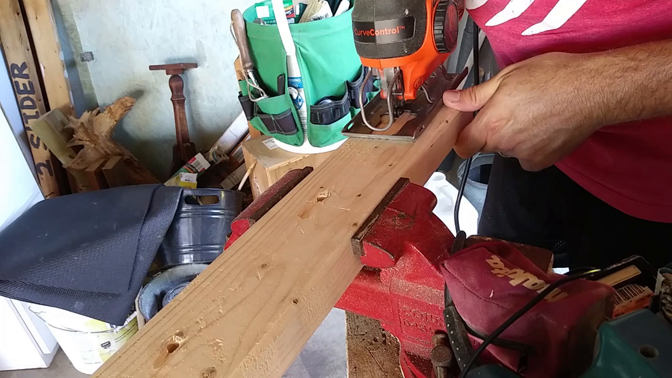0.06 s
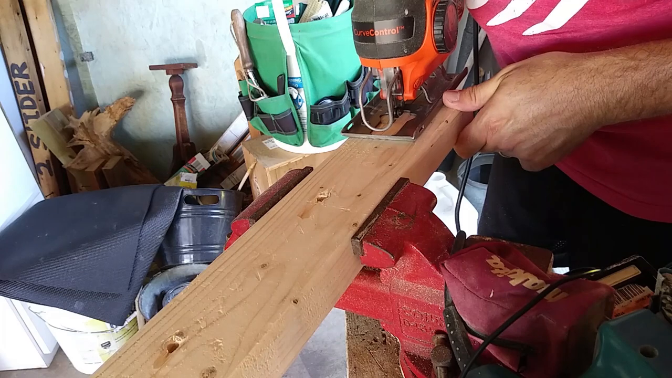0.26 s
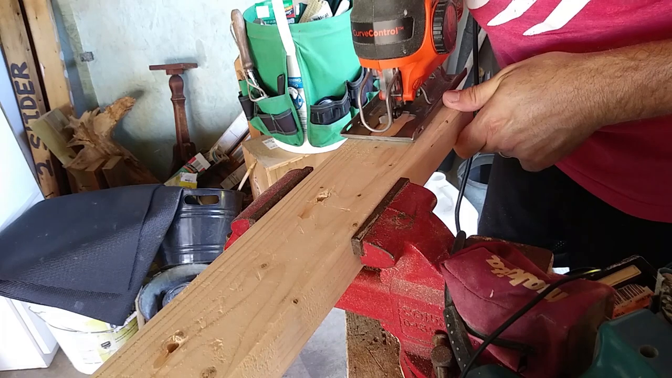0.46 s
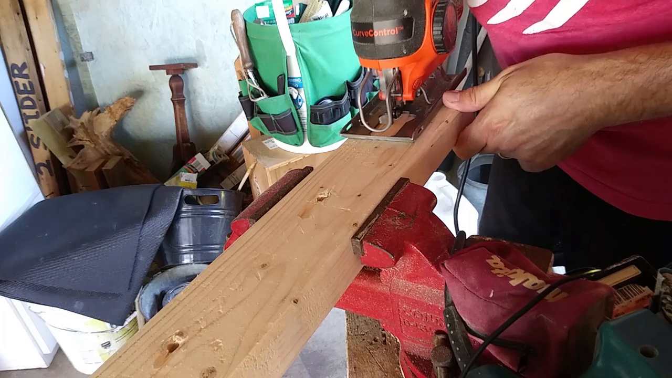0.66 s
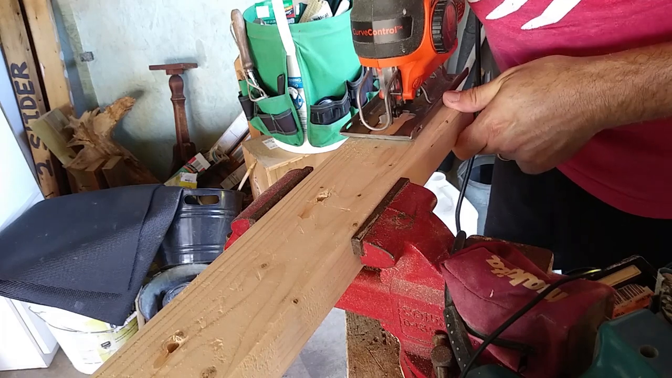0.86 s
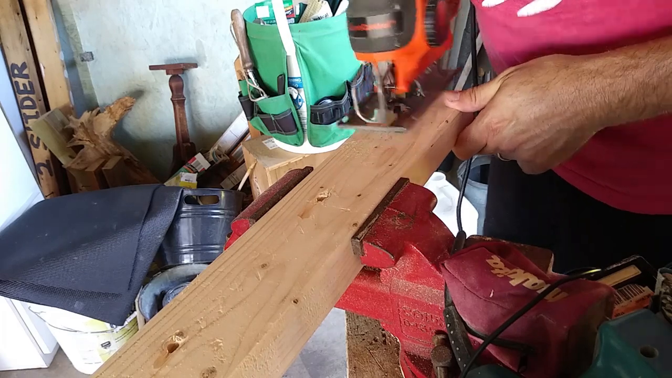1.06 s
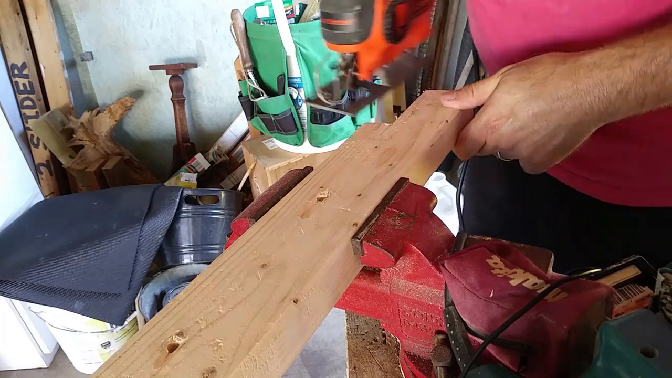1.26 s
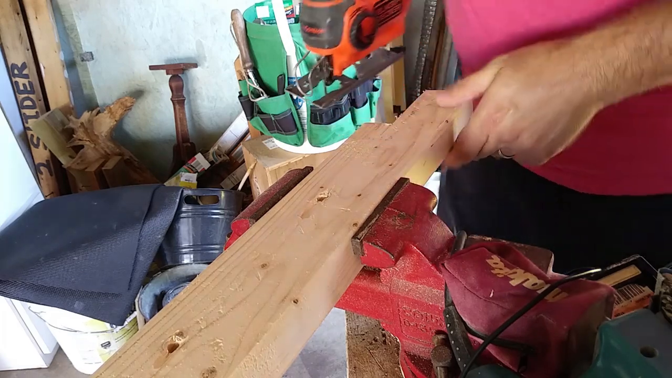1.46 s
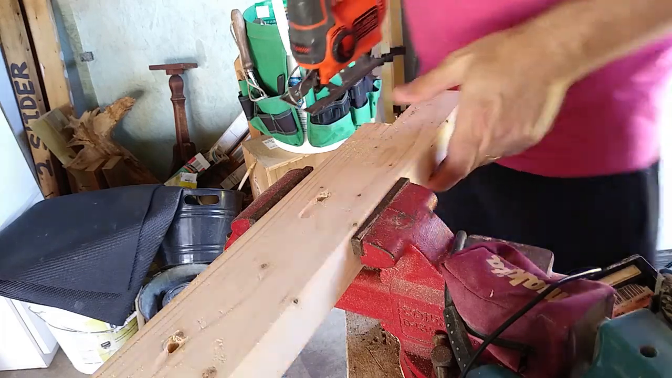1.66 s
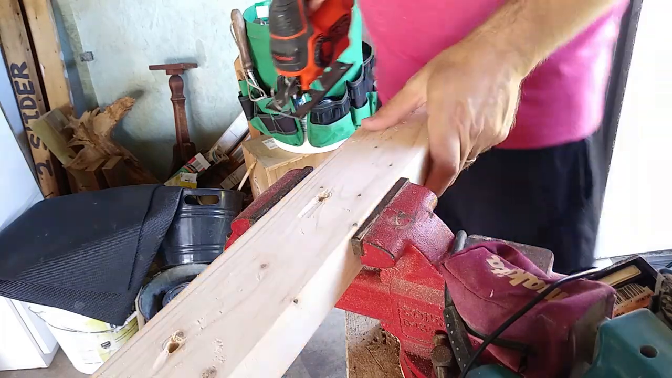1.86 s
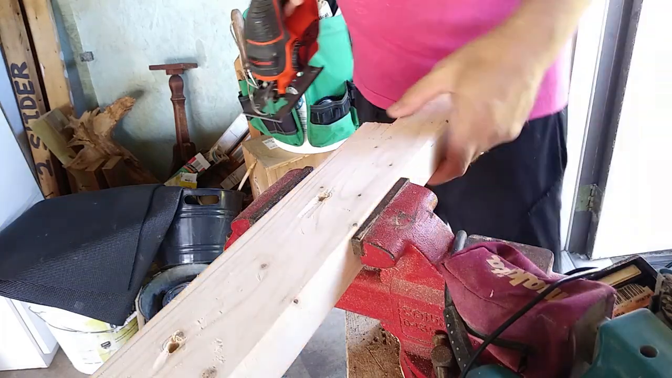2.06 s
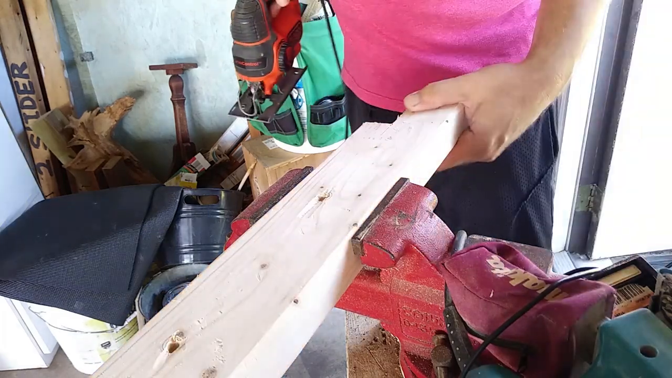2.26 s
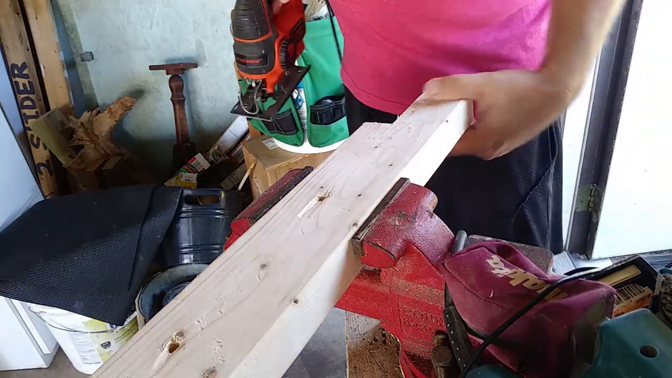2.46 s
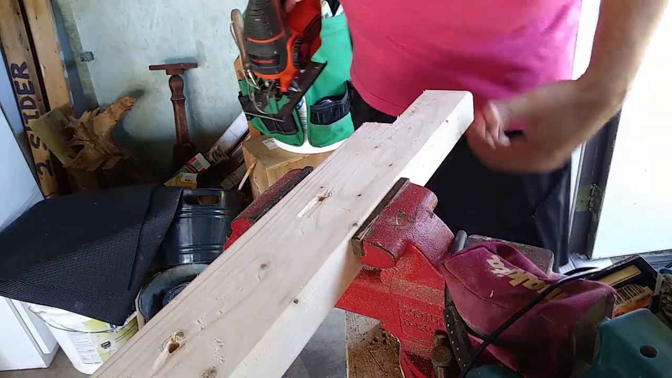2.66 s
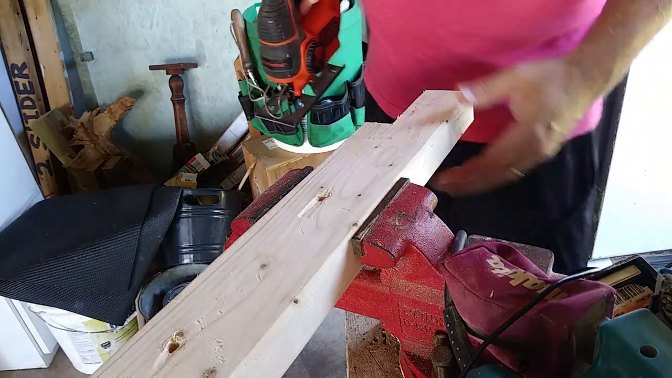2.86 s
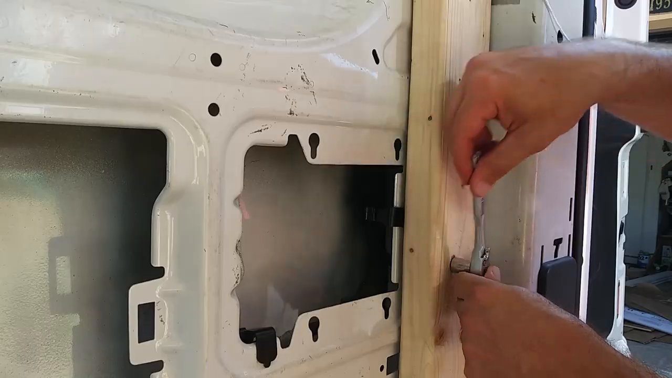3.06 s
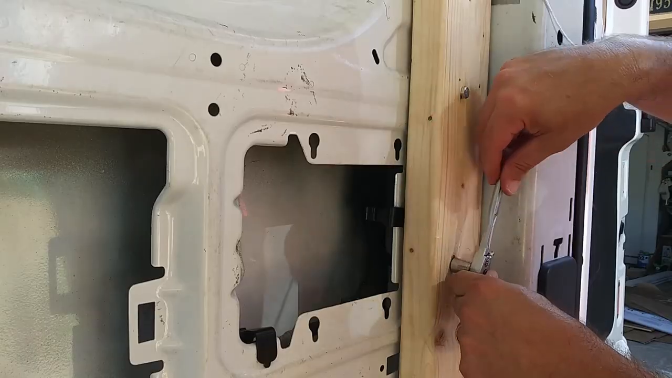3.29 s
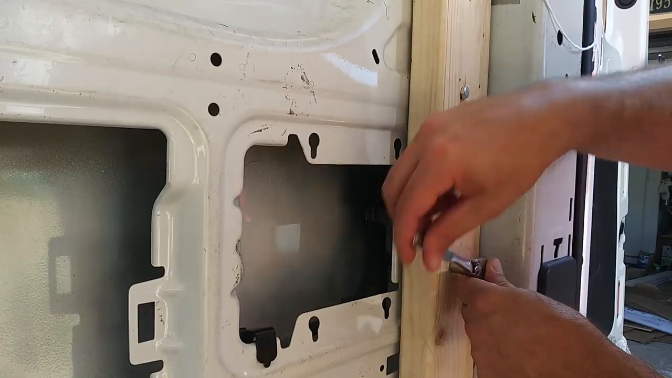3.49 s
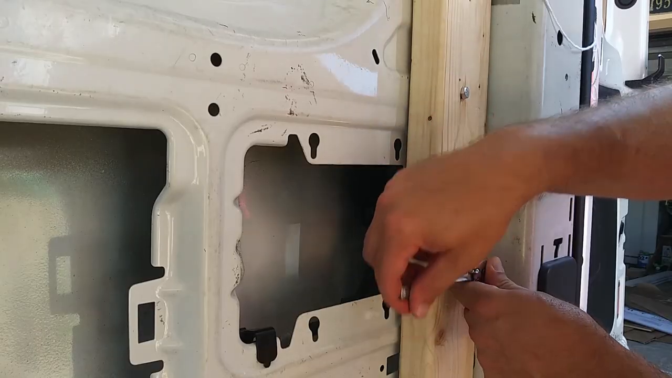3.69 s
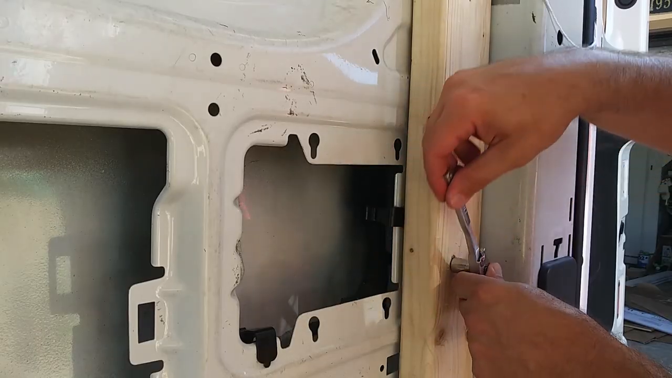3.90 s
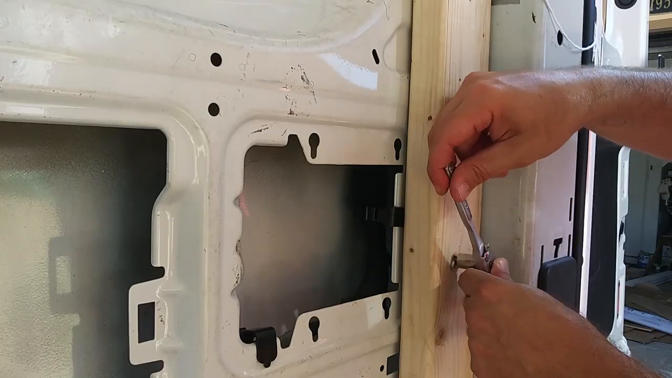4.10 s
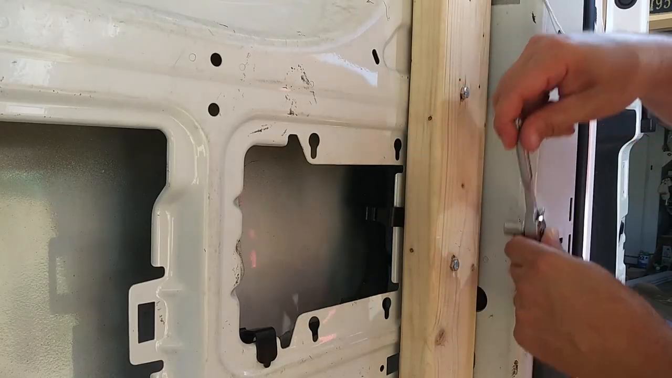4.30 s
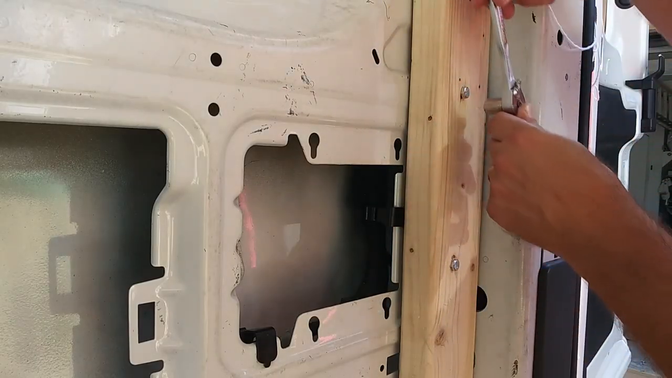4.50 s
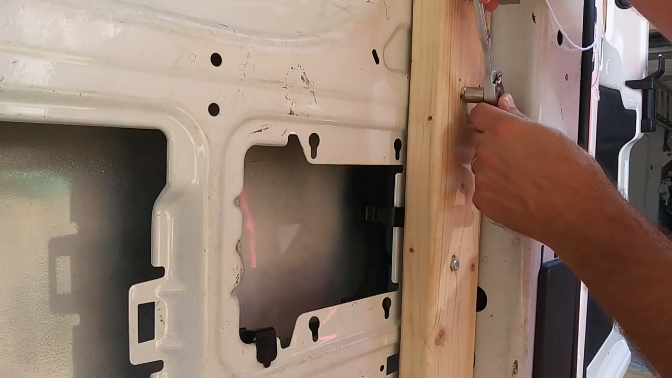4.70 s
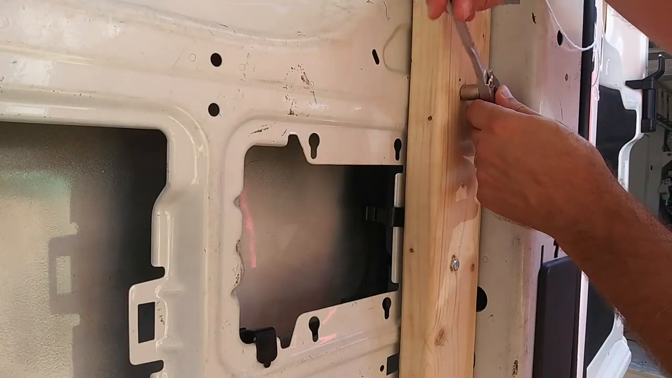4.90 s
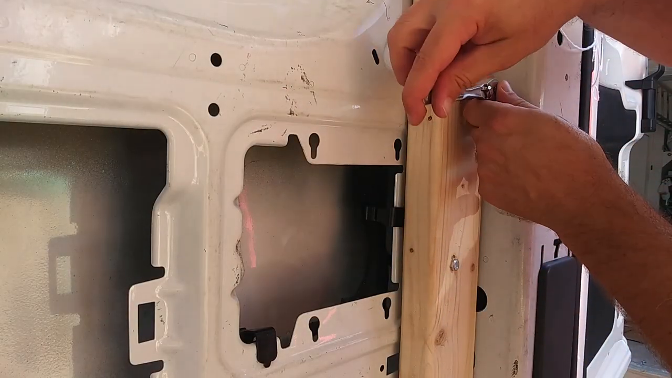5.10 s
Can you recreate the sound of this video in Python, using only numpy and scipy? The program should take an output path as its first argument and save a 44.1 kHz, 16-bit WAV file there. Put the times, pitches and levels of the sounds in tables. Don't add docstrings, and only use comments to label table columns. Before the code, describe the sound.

Close jigsaw noise fills the first part: dense gritty buzz with gear whine, then a steady slowdown into distinct rasping strokes and tiny chirping squeaks until it stops. Quiet room air follows. Then a hand wrench works at a metal panel: light rubbing, dull knocks, rapid ratchet clicking, more scattered knocks, a loud clipped clank with rattles and a final evenly spaced click burst. Short room reflections, limited treble.

```python
import sys
import numpy as np
from scipy import signal
from scipy.fft import rfft, irfft
from scipy.io import wavfile

SR = 44100
rng = np.random.default_rng(int(sys.argv[2]) if len(sys.argv) > 2 else 0)


def boost_factor(decibels):
    exponent = np.asarray(decibels, float) / 20
    return 10 ** exponent


def transcribe(u):
    v = np.clip(np.atleast_2d(u).T, -1, 1)
    q = np.round(v * 32767).astype(np.int16)
    wavfile.write(sys.argv[1], SR, q)


N = 226850
TIME = np.arange(N) / SR

# t/s, rate/(strokes/s)
POWERED = [(0, 30.11), (.3, 28.75), (.4, 29.104), (.561, 29.104)]
# t/s, level/dB
VIGOUR = [(0, 0.5), (.6, -0.15), (1.16, -4), (1.63, -10.5), (1.95, -16), (2.15, -19.5), (2.45, -38),
          (2.55, -50.5), (2.68, -54)]
# f/Hz, density/dB
CUTTING_COLOUR = [(150, -49.5), (250, -31.5), (636, -2.5), (731, -11), (825, -3.5), (1190, -7.5),
                  (2540, -3.5), (2770, 0), (3590, -8.5), (4050, -2.5), (6570, -5), (9290, -16.5),
                  (14600, -23.5), (15600, -33)]
# f/Hz, density/dB
COASTING_COLOUR = [(53, -88), (90, -69), (454, -27.5), (551, -4.5), (812, -20), (925, -16.5), (1050, -10),
                   (1880, -3), (2440, -9), (2900, -4.5), (3680, -8.5), (7990, -6.5), (10600, -20.5),
                   (15600, -34)]
# f/Hz, width/Hz, lift/dB
SAW_MODES = [(645, 45, 3), (1350, 70, 3), (1890, 70, 3.5), (862, 14, 6), (1528, 830, 2), (2800, 90, 3.5),
             (5300, 340, 2.5), (6300, 1200, 2)]
# level/dB, share of vigour, break-through lift/dB
BODY = [(-19.5, 0.96, 3.5), (-13, 1.05, 0.17), (-26, 1.06, 0)]
# powered level/dB, coasting level/dB
TONES = [(-26, -29), (-23, -46), (-21, -24.5)]
# t/s, extra level/dB
BITES = [
    (0.171, 9),
    (0.309, 8),
    (.68, 5),
    (1.15, 4),
]
# start/stroke, earlier/(stroke per stroke/s), length/s,
# extra length/stroke, from f/Hz, to f/Hz
UP = (.04, 0.0026, .005, 0.15, 7700, 8400)
DOWN = (.40, 0.011, .008, .065, 7000, 5800)
# t/s, length/s, from f/Hz, to f/Hz, level/dB
STALL = [
    (0, .022, 1510, 1500, -15),
    (2.037, 0.02, 7600, 9060, -24.5),
    (2.055, 0.024, 7920, 8470, -16.5),
    (2.113, .024, 8350, 6040, -18.5),
    (2.309, 0.019, 7450, 8900, -25.5),
    (2.314, 0.059, 8800, 9000, -39),
    (2.502, 0.068, 6630, 6600, -59),
    (2.583, 0.047, 6550, 6530, -55),
]
# t/s, peak level/dB, ringing f/Hz, thud re peak/dB
PAWL = [(3.4231, -10, 1330, -10), (3.457, -8, 1350, -5.5), (3.492, -12.5, 4100, -12),
        (3.5201, -10.5, 4740, -13), (3.5496, -10.5, 4150, -29), (3.58, -11.5, 6040, -17),
        (3.6152, -10, 5800, -23), (3.6708, -10.5, 5600, -16.5), (4.9887, -9, 4920, -20),
        (5.0387, -9, 4950, -19.5), (5.0822, -10.5, 2430, -15), (5.1354, -7.5, 4760, -22)]
# t/s, peak level/dB, ringing f/Hz, thud re peak/dB
KNOCKS = [(3.1014, -40, 1489, -3.5), (3.1566, -31.5, 1970, -15), (3.1985, -33, 2080, -3),
          (3.3502, -23.5, 3370, -20), (3.3739, -22.5, 1870, -17), (3.3904, -12, 1260, -29),
          (3.7754, -18, 1600, -28), (3.7964, -27, 1340, -11), (3.8425, -13, 1800, -17),
          (4.1014, -25.5, 1174, -5.5), (4.1348, -7, 1630, -28), (4.1428, -14.5, 4700, -11),
          (4.4303, -40.5, 1220, -4), (4.6355, -0.5, 1410, -23.5), (4.7308, -15, 1700, -13),
          (4.7441, -10, 4700, -16.5), (4.7514, -15, 4900, -27), (4.7576, -14, 3650, -7.5),
          (4.777, -13, 2370, -20), (4.8673, -29, 1860, -22), (4.8908, -38.5, 1770, -6)]
# f/Hz, level/dB, t60/s
STEEL = [(2450, -33, .06), (4150, -31, .06), (5100, -32, .06), (7450, -36, .06), (10700, -40, .06),
         (14500, -41, .05)]
# f/Hz, level/dB, t60/s
PANEL = [(740, -26, .14), (800, -27, .15), (900, -26, .14), (960, -28, .12), (1330, -31, .09),
         (1750, -32, .1), (3150, -31, .09)]
# start t/s, end t/s, fade/s, level/dB, centre f/Hz
SCUFFS = [(2.957, 3.003, 0.0034, -52, 6000), (2.954, 2.999, 0.0034, -55.5, 2160),
          (2.959, 3.038, 0.042, -62, 323), (3.0, 3.112, 0.033, -57, 1350),
          (3.098, 3.17, 0.024, -52.5, 1470), (3.151, 3.214, 0.044, -43.5, 1560),
          (3.195, 3.282, .06, -51.5, 507), (3.336, 3.713, 0.079, -48.5, 455),
          (3.402, 3.552, 0.065, -38, 1100), (3.692, 3.784, 0.031, -47.5, 1500),
          (3.779, 3.903, 0.085, -40, 495), (3.836, 3.967, 0.11, -44, 1110), (4.095, 4.168, .01, -39, 1440),
          (4.122, 4.29, 0.13, -50.5, 500), (4.428, 4.538, 0.084, -59, 1400),
          (4.632, 4.733, 0.035, -36, 865), (4.767, 4.89, 0.1, -39, 730), (4.878, 4.965, 0.051, -58, 900)]
# f/Hz, t60/s
ROOM = [(250, 0.44), (1000, 0.24), (4000, 0.15), (9000, 0.16), (16000, 0.093)]
# f/Hz, density/dB
BENCH_FLOOR = [(24, -76), (40, -46.5), (287, -15.5), (318, -14.5), (351, -4), (474, -15), (510, 2.5),
               (623, -12), (884, -2.5), (1690, -10), (15600, -25)]
# f/Hz, density/dB
WALL_FLOOR = [(60, -36), (200, -16), (450, -3), (700, -8), (1500, -7), (2500, -13), (4500, -14),
              (6500, -14), (8500, -23), (15600, -27)]

WOOD_DRAG_PER_S, WOOD_DRAG_S = 2.972, .0956
COAST_S, FRICTION_PER_S = 7.709, 92.355
FIRST_STROKE, FAN_PER_STROKE = -.58, 27.83
BREAK_S, BREAK_WIDTH_S = 0.68, 0.3
SLACK_S, SLACK_WIDTH_S, SLACK_DB = .62, .055, -16
TONES_FADE_S, TONES_FADE_DB_PER_S = 1.035, -120
RASP_DB, RASP_PER_VIGOUR, RASP_SPREAD_DB, BITE_S = -16.5, 1.4, 3.5, 0.047
SQUEAKING = range(24, 39)
DOWN_RISE_HZ_PER_S = 6000
UP_DB, UP_WAKES_PER_S, UP_WAKE_DB = -18.5, 7.5, -.8
DOWN_DB, SQUEAK_SPREAD_DB = -13, .8
SCRAPE_DB, SCRAPE_PER_VIGOUR, UP_SCRAPE_DB = -19, 0.89, 1.5
STALL_SCRAPE_DB = -20
JOLT_S, JOLT_DB, JOLT_RISE_S = 4.6355, -13, .02
WALL_CUT_HZ = 12500
SCENE_CHANGE_S = 2.955
BENCH_FLOOR_DB, WALL_FLOOR_DB = -60.5, -61.5
NOISE_EDGE_HZ, TOP_HZ = 15800, 15780
OVERLOAD = 0.64


def saw_speed():
    release_s, top = POWERED[-1]
    since_s = np.maximum(TIME - release_s, 0)
    coast = (top - WOOD_DRAG_PER_S + FRICTION_PER_S) * np.exp(-since_s / COAST_S) - FRICTION_PER_S
    coast = coast + WOOD_DRAG_PER_S * np.exp(-since_s / WOOD_DRAG_S)
    return np.where(TIME < release_s, in_time(POWERED)[0], np.maximum(coast, 0))


def stroke_phase():
    done = FIRST_STROKE + np.cumsum(saw_speed()) / SR
    chance = rng.standard_normal(50)[done.astype(int) + 1]
    db = RASP_DB + RASP_PER_VIGOUR * in_time(VIGOUR)[0] + RASP_SPREAD_DB * chance
    bites_db = sum(extra_db * bump(s, BITE_S) for s, extra_db in BITES)
    return done, boost_factor(db + bites_db)


def saw_body(phase):
    white, hz = rfft(rng.standard_normal(N)), np.arange(N // 2 + 1) * SR / N
    cutting = coloured(white, CUTTING_COLOUR, SAW_MODES)
    coasting = coloured(white, COASTING_COLOUR, SAW_MODES)
    free = np.clip((TIME - .7) / 2.0, 0, 1)
    swell = np.cos(2 * np.pi * (phase - .25))
    depth_db = np.interp(TIME, [0, .8, 1.4, 2.1, 2.4], [0.44, 0.32, 1.2, 0.81, 0.2])
    grain = boost_factor(1.64 * drift(150))
    bands_hz = [(40, 2200), (2200, 7500), (7500, 16000)]
    out = 0
    for (low, high), (db, share, break_db) in zip(bands_hz, BODY):
        db = db + share * in_time(VIGOUR)[0] + break_db * bump(BREAK_S, BREAK_WIDTH_S)
        inside = (hz > low) * (hz <= high)
        cut_noise = rms_one(irfft(cutting * inside, N))
        free_noise = rms_one(irfft(coasting * inside, N))
        blend = (1 - free) * cut_noise + free * free_noise
        middle_hz = np.sqrt(max(low, 500) * high)
        lower = lowpass(blend, 4, middle_hz)
        flutter = lower * boost_factor(0.5 * drift(25)) + (blend - lower) * boost_factor(0.66 * drift(25))
        out = out + flutter * boost_factor(db + depth_db * swell * (high / 2200) ** 0.14)
    return out * grain * (TIME < VIGOUR[-1][0])


def whine(phase):
    wobble = 1 + .0015 * drift(30)
    turn = 2 * np.pi * np.cumsum(FAN_PER_STROKE * saw_speed() * wobble) / SR
    load_db = 2.5 - 20 * np.clip(phase - .6, 0, 1) / .4 - 8 * np.exp(-phase / .05)
    free = np.clip((TIME - POWERED[-1][0]) / 0.12, 0, 1)
    slack_db = SLACK_DB * bump(SLACK_S, SLACK_WIDTH_S)
    drive_db = slack_db + TONES_FADE_DB_PER_S * np.maximum(TIME - TONES_FADE_S, 0)
    out = 0
    for multiple, (on_db, off_db) in zip([1, 10 / 3, 5], TONES):
        db = on_db + (off_db - on_db) * free + drive_db + load_db + 3.1 * drift(35)
        out = out + boost_factor(db) * np.sin(multiple * turn)
    return out


def rasp(phase, gain):
    shape = np.minimum(phase / 0.022, 1) * np.exp(-phase / 0.19)
    grit = rng.standard_normal(N) * boost_factor(2.5 * drift(400))
    edge = boost_factor(2) * rms_one(band(grit, 13500, 15100, order=3))
    lower_db = np.interp(TIME, [.5, 2.3], [-4, -12])
    bright = edge + boost_factor(lower_db) * rms_one(band(grit, 9400, 9800))
    return boost_factor(-11.0) * gain * shape * bright


def slips(done):
    rows, rate, vigour_db = [], saw_speed(), in_time(VIGOUR)[0]
    chances_db = SQUEAK_SPREAD_DB * rng.standard_normal((len(SQUEAKING), 2))
    for stroke, chance_db in zip(SQUEAKING, chances_db):
        i = np.searchsorted(done, stroke)
        per_s = rate[i]
        levels = UP_DB + UP_WAKE_DB * max(per_s - UP_WAKES_PER_S, 0), DOWN_DB
        for (at, earlier, length_s, longer, from_hz, to_hz), db, c in zip((UP, DOWN), levels, chance_db):
            start_s = np.searchsorted(done, stroke + at - earlier * per_s) / SR
            lift_hz = DOWN_RISE_HZ_PER_S / per_s * (to_hz < from_hz)
            scrape_db = SCRAPE_DB + SCRAPE_PER_VIGOUR * vigour_db[i] + UP_SCRAPE_DB * (to_hz > from_hz)
            rows.append((start_s, length_s + longer / per_s, from_hz + lift_hz, to_hz, db + c, scrape_db))
    return rows + [(*row, row[-1] + STALL_SCRAPE_DB) for row in STALL]


def squeaks(rows):
    out = np.zeros(N)
    for s, length_s, from_hz, to_hz, db, scrape_db in rows:
        i, n = round(s * SR), round(length_s * SR)
        hump = np.sin(np.pi * np.arange(n) / n) ** .5
        glide_hz = np.linspace(from_hz, to_hz, n) * (1 + .021 * drift(300, size=3000)[:n])
        turn = 2 * np.pi * np.cumsum(glide_hz) / SR
        flutter = boost_factor(2.6 * drift(250, size=3000)[:n])
        halo = boost_factor(-9) * drift(630, size=3000)[:n]
        partials = np.sin(turn) + boost_factor(-25.0) * np.sin(2 * turn)
        tone = boost_factor(db - 2.5) * rms_one((flutter + halo) * partials)
        noise = rng.standard_normal(3000)[:n]
        scrape = boost_factor(scrape_db) * rms_one(band(noise, .75 * to_hz, 1.22 * to_hz, order=3))
        out[i:i + n] += hump * (tone + scrape)
    return out


def wrench():
    clicks = contacts(PAWL, STEEL, rise_s=0.00085, contact_s=0.0023, rattle_db=-13, rattle_s=.018,
                      sparkle_db=-17, sparkle_hz=16400)
    knocks = contacts(KNOCKS, PANEL, rise_s=0.00076, contact_s=0.0034, rattle_db=-7.5, rattle_s=0.023,
                      sparkle_db=-22.5, sparkle_hz=10400)
    return clicks + knocks


def contacts(events, modes, rise_s, contact_s, rattle_db, rattle_s, sparkle_db, sparkle_hz):
    out, size = np.zeros(N + SR), SR // 3
    t = np.arange(size) / SR
    for s, db, hz, thud_db in events:
        white, chance_db = rng.standard_normal(size), rng.normal(0, 3, len(modes))
        burst = white * np.minimum(t / rise_s, 1) * np.exp(-t / contact_s)
        rattle = boost_factor(rattle_db) * white * np.minimum(t / 0.003, 1) * np.exp(-t / rattle_s)
        unit = burst / np.sqrt(np.sum(burst ** 2))
        spot = band(burst + .28 * rattle, hz / 1.12, hz * 1.12)
        crack = 0.64 * band(burst + rattle, 1380, 5950, order=4) + 2.24 * spot
        rings = sum(boost_factor(g + c) * ring(unit, f, t60_s) for (f, g, t60_s), c in zip(modes, chance_db))
        thud = boost_factor(thud_db) * 1.2 * band(burst + 2.53 * rattle, 381, 1280, order=3)
        sparkle = boost_factor(sparkle_db) * 1.83 * band(burst + 0.081 * rattle, 6640, sparkle_hz, order=3)
        i = round(s * SR)
        out[i:i + size] += boost_factor(db) * (crack + rings + thud + sparkle)
    return highpass(out[:N], 3, 260)


def jolt():
    t = np.maximum(TIME - JOLT_S, 0) / JOLT_RISE_S
    return boost_factor(JOLT_DB) * t * np.exp(-t)


def scuffs():
    out, grit = 0, rng.standard_normal(N) * boost_factor(1.9 * drift(110))
    for start_s, end_s, fade_s, db, hz in SCUFFS:
        on = np.clip(np.minimum((TIME - start_s) / .004, (end_s - TIME) / fade_s), 0, 1)
        out = out + boost_factor(db) * on * rms_one(band(grit, hz / 1.48, hz * 1.38))
    return out


def room(x):
    t = np.arange(SR // 2) / SR
    white = rng.standard_normal(len(t))
    tail = 0
    for hz in 250 * 2. ** np.arange(7):
        octave = band(white, hz / np.sqrt(2), hz * np.sqrt(2))
        tail = tail + octave * boost_factor(-60 * t / at_hz(ROOM, hz))
    tail = tail * np.minimum(t / 0.0086, 1)
    return signal.fftconvolve(x, tail / np.sqrt(np.sum(tail ** 2)))[:N]


def floor():
    white = rfft(rng.standard_normal(N))
    bench = boost_factor(BENCH_FLOOR_DB) * rms_one(irfft(coloured(white, BENCH_FLOOR), N))
    wall = boost_factor(WALL_FLOOR_DB) * rms_one(irfft(coloured(white, WALL_FLOOR), N))
    return np.where(TIME < SCENE_CHANGE_S, bench, wall)


def rms_one(x):
    return x / np.sqrt(np.mean(x ** 2) + 1e-20)


def in_time(rows):
    s, *columns = np.transpose(rows)
    return [np.interp(TIME, s, c) for c in columns]


def at_hz(points, hz):
    table_hz, values = np.transpose(points)
    return np.interp(np.log(hz), np.log(table_hz), values)


def bump(centre_s, width_s):
    return np.exp(-((TIME - centre_s) / width_s) ** 2)


def band(x, low_hz, high_hz, order=2):
    edges_hz = [low_hz, min(high_hz, .45 * SR)]
    return signal.sosfilt(signal.butter(order, edges_hz, "band", fs=SR, output="sos"), x)


def lowpass(x, order, hz):
    return signal.sosfilt(signal.butter(order, hz, fs=SR, output="sos"), x)


def highpass(x, order, hz):
    return signal.sosfilt(signal.butter(order, hz, "high", fs=SR, output="sos"), x)


def drift(rate_hz, size=N):
    r = np.exp(-2 * np.pi * rate_hz / SR)
    slow = signal.lfilter([1], [1, -2 * r, r * r], rng.standard_normal(size + 4000))
    return rms_one(slow[-size:])


def ring(x, hz, t60_s):
    r, w = boost_factor(-60 / (t60_s * SR)), 2 * np.pi * hz / SR
    return signal.lfilter([0, np.sin(w)], [1, -2 * r * np.cos(w), r * r], x + 1e-18)


def coloured(white, spectrum, modes=()):
    hz = np.arange(len(white)) * SR / N + 1
    lift = 1 + sum((boost_factor(db) - 1) / (1 + (2 * (hz - f) / width) ** 2) for f, width, db in modes)
    return white * boost_factor(at_hz(spectrum, hz)) * lift * (hz < NOISE_EDGE_HZ)


def scene():
    done, gain = stroke_phase()
    phase = done % 1
    squeal = squeaks(slips(done)) + rasp(phase, gain)
    metal = wrench()
    wet = room(boost_factor(-9.5) * squeal + boost_factor(-11.0) * lowpass(metal, 2, WALL_CUT_HZ))
    saw = saw_body(phase) + whine(phase) + squeal
    return (saw + metal + wet + scuffs() + jolt() + floor())[None]


def top_cut(x):
    return signal.sosfilt(signal.butter(12, 16450, fs=SR, output="sos"), x)


def record(dry):
    clipped = np.clip(highpass(dry, 2, 120), -OVERLOAD, OVERLOAD)
    mix = signal.sosfilt(signal.ellip(8, .5, 42, TOP_HZ, fs=SR, output="sos"), clipped)
    return top_cut(mix)


dry = scene()
out = record(dry)
transcribe(out)
```